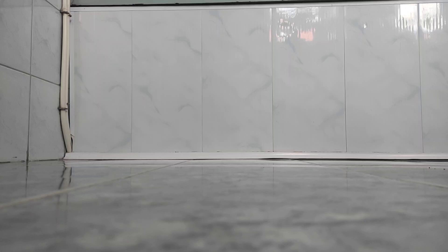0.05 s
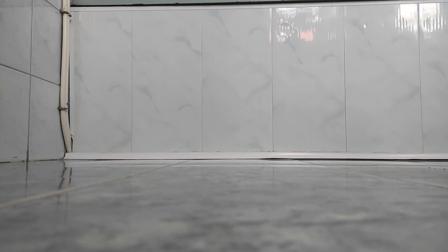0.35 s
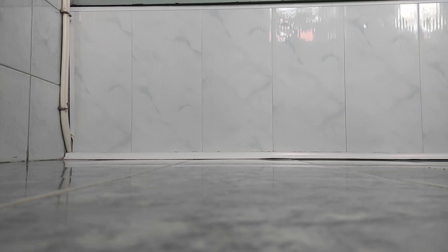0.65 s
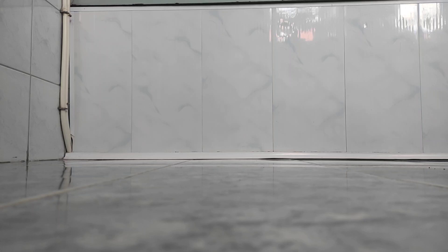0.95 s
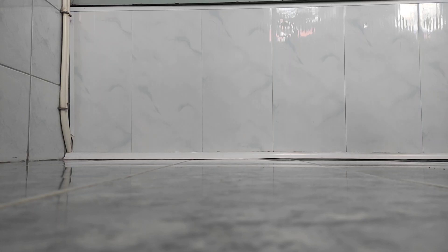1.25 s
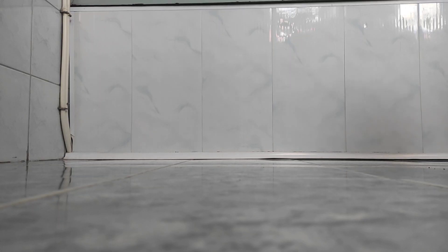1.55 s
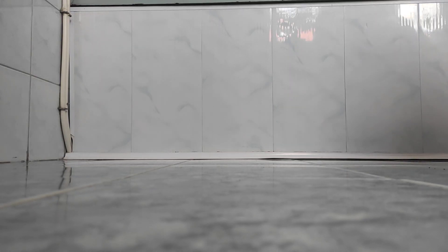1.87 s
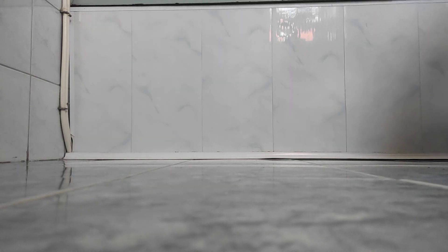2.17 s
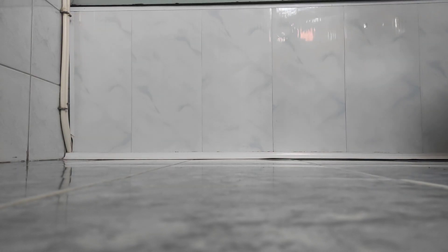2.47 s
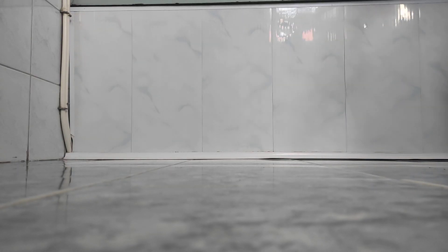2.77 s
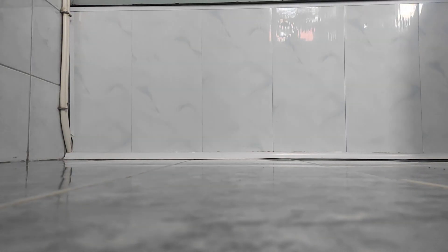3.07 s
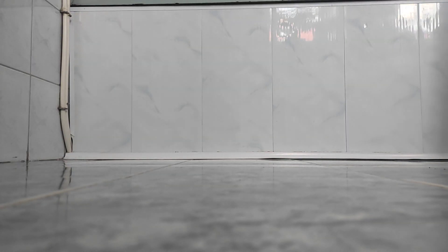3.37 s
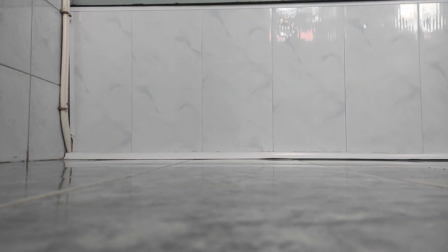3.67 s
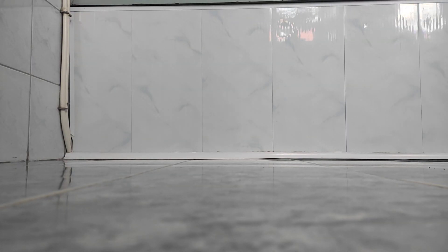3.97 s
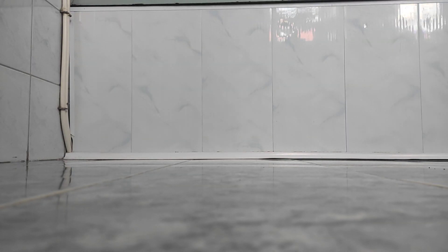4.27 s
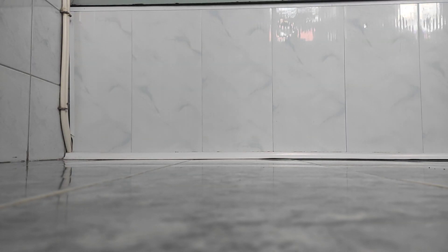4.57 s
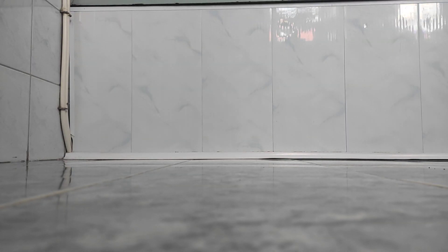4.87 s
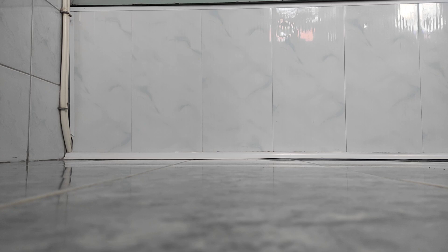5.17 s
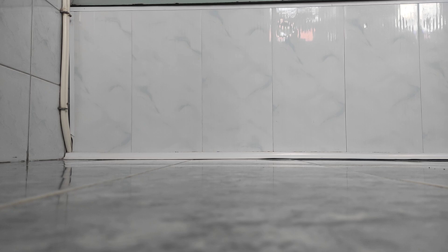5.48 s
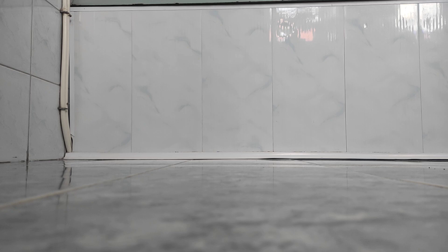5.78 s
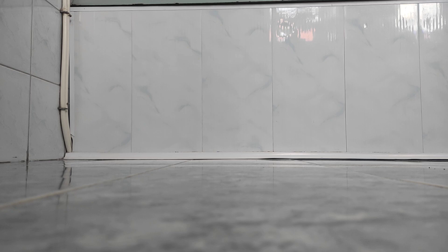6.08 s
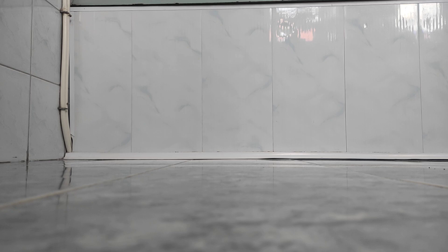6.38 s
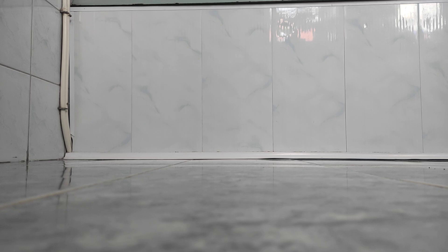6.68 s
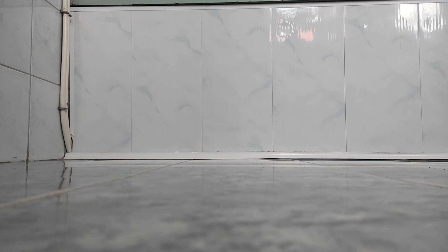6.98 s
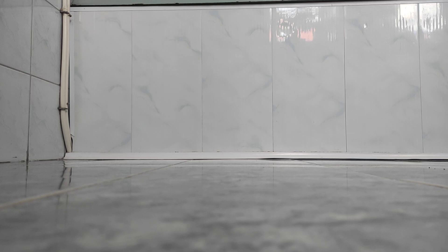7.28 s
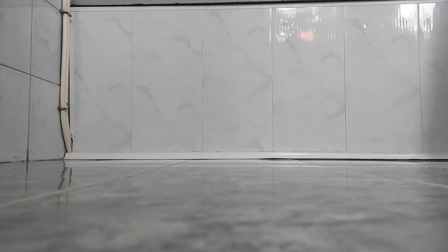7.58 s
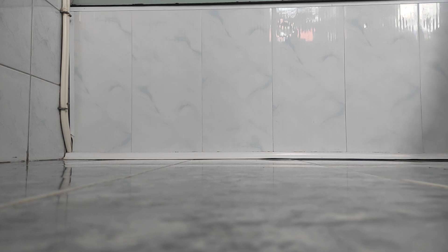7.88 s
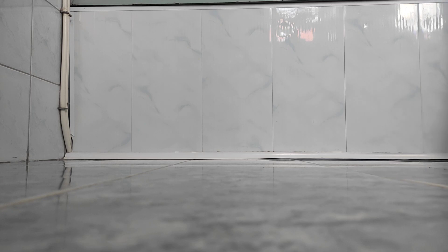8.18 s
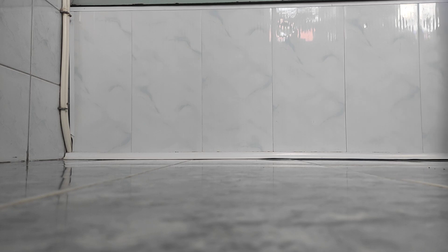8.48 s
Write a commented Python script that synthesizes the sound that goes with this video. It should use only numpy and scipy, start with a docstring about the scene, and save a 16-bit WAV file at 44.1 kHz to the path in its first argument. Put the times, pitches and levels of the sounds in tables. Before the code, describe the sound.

Wet rubber boots shuffle quietly on the floor of a small tiled room. After a light knock and two clicks, short fizzy rubs mix with squelches, heel knocks and a soft low thump. A few tiny squeaks follow, then longer hissing slides, a brief rubbery groan and a last soft step. The microphone sits low nearby, over a faint room rumble.

```python
"""Wet rubber boots shuffle and rub on a tiled floor, beside a phone standing low in a small tiled room.
The water film fizzes under the sliding soles, pressed rubber rasps, treads squelch, heels knock,
and stick-slip makes a sole chirp or groan. Heavy steps boom softly over a faint room rumble.
At the start come a knock of the phone's case, two dry clicks and a subsonic swell as the input settles.
The microphone ports ring near 7 kHz."""
import sys
import numpy as np
from scipy import signal
from scipy.fft import rfft, irfft, next_fast_len
from scipy.io import wavfile
from scipy.ndimage import uniform_filter1d

SR = 44100
rng = np.random.default_rng(int(sys.argv[2]) if len(sys.argv) > 2 else 0)


def unload_wav(signal):
    """Save mono or channel-first audio to the path in sys.argv[1] as 16-bit WAV at rate SR, clipped to [-1, 1]."""
    wavfile.write(
        sys.argv[1],
        SR,
        np.round(np.clip(np.atleast_2d(signal).T, -1, 1) * 32767).astype(np.int16),
    )


N = 385434
TIME = np.arange(N) / SR
FFT_SIZE = next_fast_len(N + SR // 2, True)
FREQ = np.maximum(np.fft.rfftfreq(FFT_SIZE, 1 / SR), 1)


def undb(db):
    """Decibels to gain."""
    return 10 ** (np.asarray(db) / 20)


def unit(x):
    """Scale to rms 1."""
    return x / np.sqrt(np.mean(x ** 2))


def filtered(x, response):
    """Apply a frequency response."""
    return irfft(rfft(x, FFT_SIZE) * response, FFT_SIZE)[..., :N]


def colour(points):
    """Gain per frequency from (frequency [Hz], level [dB]) points."""
    hz, db = np.transpose(points)
    return undb(np.interp(np.log(FREQ), np.log(hz), db))


def contour(points):
    """Gain per sample from (time [s], level [dB]) points."""
    return undb(np.interp(TIME, *np.transpose(points)))


def panned(points):
    """Stereo gains from (frequency [Hz], left minus right [dB]) points."""
    ratio = colour(points)
    return np.sqrt([ratio, 1 / ratio])


def resonance(hz, width_hz):
    """Damped resonance, gain 1 at its centre."""
    return 1 / (1 + 1j * (FREQ ** 2 - hz ** 2) / (FREQ * width_hz))


def ring(x, hz, q):
    """Two passes through one resonance, for steep skirts; rms 1."""
    b, a = signal.iirpeak(hz, max(q, .3), fs=SR)
    return unit(signal.lfilter(b, a, signal.lfilter(b, a, x)))


def wander(rate_hz):
    """Smooth random drift, spread near 1."""
    hold = int(SR / rate_hz)
    steps = np.repeat(rng.standard_normal(N // hold + 1), hold)
    return 1.08 * uniform_filter1d(steps, hold)[:N]


def swell(age_s, rise_s, fall_s, firmness):
    """Envelope, 1 at age 0; firmness 1 is pointed, 3 starts and stops abruptly."""
    return np.exp(-np.abs(age_s / np.where(age_s < 0, rise_s, fall_s)) ** firmness)


def bloom(age_s, rise_s):
    """Envelope: grows to 1 at rise_s, then dies away."""
    return age_s / rise_s * np.exp(1 - age_s / rise_s)


def add(track, start_s, sound):
    """Mix a sound into a track."""
    i = max(int(start_s * SR), 0)
    track[..., i:i + sound.shape[-1]] += sound[..., :N - i]


def crackle(rate_hz, spread_db, size):
    """Tiny slips and bursting films: random clicks of uneven size; rms 1."""
    clicks = np.zeros(size)
    hit = rng.random(size) < rate_hz / SR
    sign, strength = rng.standard_normal((hit.sum(), 2)).T
    clicks[hit] = np.sign(sign) * undb(spread_db * strength)
    return unit(clicks)


def slips(rate_hz, spread_db, size, scatter_db=8.0, wall_db=-2, wall_lag_ms=.8):
    """Stereo clicks: direct ones shared, side-wall ones late on the left, other echoes independent."""
    direct, wall, left, right = (crackle(rate_hz, spread_db, size) for _ in range(4))
    mirrored = np.array([np.roll(wall, int(wall_lag_ms * SR / 1000)), wall])
    return unit(direct + undb(wall_db) * mirrored + undb(scatter_db) * np.array([left, right]))


def rumble(db=-66.0, flutter_db=2.0, shared_hz=330, bass_hz=700):
    """Room rumble; flutters in the bass, where both sides hear nearly the same."""
    # rumble spectrum: (frequency [Hz], relative density [dB])
    spectrum = [(20, 4.5), (45, 1), (62, -1), (90, -8.5), (130, -7), (200, -4.5), (300, -10), (400, -10.5),
                (700, -16), (1500, -21.5), (3000, -24.5), (8000, -32), (10000, -34), (15000, -49.5)]
    # rumble balance: (frequency [Hz], left minus right [dB])
    balance = [(50, 6.5), (200, 6), (500, 5), (1200, 3.5), (3000, 0.5), (8000, -2)]
    shared_power = .85 / (1 + (FREQ / shared_hz) ** 2)
    air = filtered(rng.standard_normal(N), np.sqrt(shared_power))
    air = air + filtered(rng.standard_normal((2, N)), np.sqrt(1 - shared_power))
    flutter = undb(flutter_db * wander(20))
    air = air + filtered(air, FREQ < bass_hz) * (flutter - 1)
    return undb(db) * unit(filtered(air, colour(spectrum) * panned(balance)))


def film_fizz(fizz, speed, top_hz=10000, reference_db=-68, growth=0.43):
    """A faster sole fizzes louder; the top hiss brightens with louder strokes."""
    # top hiss at the reference level: (time [s], gain above top_hz [dB])
    top_brightness = [(2.8, -2), (3.3, 1.5), (4.2, 0.5), (4.5, -1.5), (5.68, -7.5), (5.76, 0.5),
                      (6.69, 0.5), (6.75, -1), (7.05, 2)]
    top_gain = contour(top_brightness) * (speed / undb(reference_db)) ** growth
    return speed * (fizz + filtered(fizz, FREQ > top_hz) * (top_gain - 1))


def sliding(fizz_db=-1.5, rasp_db=-1, creep_rasp_db=-6, hollow_db=-4, hollow_q=0.34, judder_db=0.94):
    """Dense micro-slips of wet rubber; the grip judders and shakes fizz and rasp together."""
    # water film: (frequency [Hz], relative density [dB])
    fizz_spectrum = [(1500, -27.5), (3500, -7.5), (5500, -5), (7200, -3.5), (8600, -7.5), (9200, -11),
                     (9700, -20), (12500, -24), (15500, -31)]
    # pressed rubber: (frequency [Hz], relative density [dB])
    rasp_spectrum = [(200, 4), (550, 7.5), (900, 7), (1400, 3.5), (2000, 1.5), (2800, 1.5), (4200, -4.5),
                     (6000, -10.5), (10000, -40)]
    # soles creeping between strokes: (time [s], level [dB])
    creep = [(.2, -95), (.62, -89), (.9, -78.5), (1.3, -71), (2.4, -71.5), (2.6, -67.5), (2.9, -72.5),
             (3.3, -66.5), (3.95, -69), (4.48, -78), (5.4, -72.5), (6.9, -75), (7.55, -79), (8.38, -88),
             (8.52, -77.5)]
    # sole strokes: (fastest at [s], level [dB], rise [s], fall [s], rasp offset [dB],
    # hollow under the sole [Hz], firmness [-])
    strokes = [(.35, -78.5, .055, .091, -2, 600, 1.2), (.474, -76, .033, .018, -4, 450, 1.2),
               (.8, -71, 0.055, 0.099, -5, 2000, 0.76), (1.037, -64.5, .016, 0.077, -8, 905, 1.1),
               (1.204, -67.5, 0.035, 0.06, -7, 2460, 1), (1.307, -70.5, .017, .044, 2, 1810, 1.5),
               (1.435, -67, 0.077, 0.073, 2, 1000, 1.5), (1.653, -66, .018, 0.072, -7, 2770, 1.3),
               (1.816, -63.5, 0.051, 0.12, -6, 1780, 1.2), (1.992, -62, 0.04, 0.047, -7, 1850, 1.7),
               (2.335, -65, 0.054, 0.054, 3, 1110, 0.95), (2.52, -61, 0.038, 0.054, -4, 2300, 1.7),
               (2.666, -65.5, .008, .12, -3.5, 2180, 1.2), (3.11, -74.5, 0.097, 0.038, 3, 1780, 1.4),
               (3.25, -63, 0.027, 0.029, -14, 2800, 1.2), (3.442, -61.5, 0.035, .028, -5, 2380, 1.8),
               (3.635, -60, 0.062, 0.073, -4, 800, 1.7), (3.86, -69.5, .06, 0.035, -10, 400, 1.2),
               (4.16, -62.5, .11, 0.13, -9.5, 400, 1.3), (4.4, -69.5, 0.023, 0.021, -14, 2600, 1.2),
               (4.85, -61, 0.22, 0.16, -33, 4540, 1.26), (5, -56.5, .19, 0.26, -12, 1980, 1.05),
               (5.77, -62, 0.076, 0.14, -24, 3000, 2), (5.9, -63, .11, 0.2, -17, 2590, 1.2),
               (6.17, -59, 0.22, 0.47, -8.5, 2080, 1.3), (6.32, -59, 0.11, 0.13, -8.5, 1250, 2.4),
               (6.635, -58.5, 0.14, 0.079, -7.5, 1600, 1.5), (6.8, -67.5, 0.028, 0.079, -10, 2260, 1.3),
               (7.04, -67, .016, .04, -11, 2990, 1.8), (7.115, -63.5, 0.087, .17, -8.5, 910, 1.15),
               (7.83, -76, 0.1, 0.36, -8.5, 2300, 0.99)]
    fizz = unit(filtered(slips(rate_hz=14000, spread_db=3, size=N), colour(fizz_spectrum)))
    rasp = unit(filtered(slips(rate_hz=6000, spread_db=3, size=N), colour(rasp_spectrum)))
    fizz_power = contour(creep) ** 2
    rasp_power = fizz_power * undb(creep_rasp_db) ** 2
    hollow = np.zeros((2, N))
    for at_s, db, rise_s, fall_s, press_db, hz, firmness in strokes:
        near = slice(*np.searchsorted(TIME, [at_s - 4 * rise_s, at_s + 4 * fall_s]))
        speed = undb(db) * swell(TIME[near] - at_s, rise_s, fall_s, firmness)
        force = speed * undb(press_db)
        fizz_power[near] += speed ** 2
        rasp_power[near] += force ** 2
        hollow[:, near] += force * ring(rasp[:, near], hz, hollow_q)
    water = undb(fizz_db) * film_fizz(fizz, np.sqrt(fizz_power))
    rubber = undb(rasp_db) * rasp * np.sqrt(rasp_power) + undb(hollow_db) * hollow
    return (water + rubber) * undb(judder_db * wander(70))


def case_knock(start_s=.2277, db=-48, tick_hz=1500, thud_hz=170, sag_s=0.0012, decay_s=0.011):
    """The phone's case settles on the floor by the left port: a tick that drops at once to a thud."""
    out, t = np.zeros(N), TIME[:SR // 8]
    hz = thud_hz + (tick_hz - thud_hz) * np.exp(-t / sag_s)
    phase = 2 * np.pi * np.cumsum(hz) / SR
    add(out, start_s, undb(db) * np.exp(-t / decay_s) * np.sin(phase))
    return out * undb([[0], [-24]])


def input_settling(start_s=0.24, rise_s=0.087, db=-33, pan_db=6.5, undershoot_db=-21, undershoot_s=0.6,
                   drift_db=-25, drift_decay_s=3.1):
    """A slow subsonic swell, undershoot and fading drift as the input settles."""
    age_s = np.maximum(TIME - start_s, 0)
    wave = bloom(age_s, rise_s) - undb(undershoot_db) * bloom(age_s, undershoot_s)
    drift = undb(drift_db) * uniform_filter1d(wander(12), SR // 12)
    settling = np.minimum(age_s / rise_s, 1) * np.exp(-age_s / drift_decay_s)
    return (wave + drift * settling) * undb([[db + pan_db], [db - pan_db]])


def dry_clicks(decay_s=.012, rise_s=.00003, right_db=-11):
    """Two dry clicks near the start, each a sudden step that quickly decays."""
    # clicks: (time [s], level [dB])
    clicks = [(0.2893, -44.5), (0.329, -53)]
    out, t = np.zeros(N), TIME[:SR // 8]
    step = -(1 - np.exp(-t / rise_s)) ** 3 * np.exp(-t / decay_s)
    for start_s, db in clicks:
        add(out, start_s, undb(db) * step)
    return out * undb([[0], [right_db]])


def pops(hz=7400, rise_s=.0003, pitch_spread=.05):
    """Tiny bubbles burst at a sole's edge, each a bright tick at its own pitch."""
    # bursts: (time [s], level [dB])
    bubbles = [(1.0161, -57), (1.0189, -47), (1.0213, -51), (1.8055, -53), (1.811, -52), (2.6615, -52)]
    out, t = np.zeros(N), TIME[:SR // 100]
    for start_s, db in bubbles:
        pitch_hz = hz * (1 + pitch_spread * rng.standard_normal())
        add(out, start_s, undb(db) * bloom(t, rise_s) * np.sin(2 * np.pi * pitch_hz * t))
    return out


def knocks(heel_q=.75, splash_hz=7400, splash_q=5.2):
    """Heel or toe lands: a short dull knock, with a spit of water from the closing gap."""
    # impacts: (time [s], level [dB], decay by 27 dB [s], relative splash [dB])
    impacts = [(1.0185, -61, 0.022, -9), (1.555, -53.5, 0.019, -20), (1.653, -62, 0.012, -5),
               (1.805, -58.5, 0.018, -5), (2.661, -61, .018, -4), (8.446, -69, 0.02, -8)]
    # heel resonances: (frequency [Hz], gain [dB])
    heel_modes = [(900, 4.5), (2600, -8.5)]
    out, t = np.zeros(N), TIME[:SR // 8]
    for start_s, db, decay_s, splash_db in impacts:
        body, spit = rng.standard_normal((2, len(t)))
        heel = sum(undb(mode_db) * ring(body, hz, heel_q) for hz, mode_db in heel_modes)
        splash = undb(splash_db) * ring(spit, splash_hz, splash_q)
        add(out, start_s, undb(db) * np.exp(-np.pi * t / decay_s) * (heel + splash))
    return out


def squirt(start_s=1.02, db=-65.0, rise_s=0.029, hz=7600, q=2.5):
    """The first weight on the sole drives a thin, hissing jet of water from under its edge."""
    out, t = np.zeros((2, N)), TIME[:SR // 4]
    jet = ring(slips(rate_hz=9000, spread_db=3.3, size=len(t)), hz, q)
    add(out, start_s, undb(db) * bloom(t, rise_s) * jet)
    return out


def treads(q=0.91, slip_hz=1500, grain_db=3, rise_share=0.052):
    """A tread presses out water: a burst of slips rings the pocket under the sole."""
    # presses: (time [s], level [dB], decay by 40 dB [s], pocket [Hz])
    presses = [(1.146, -66.5, .12, 420), (1.285, -59, 0.2, 310), (1.78, -60, .039, 350),
               (1.805, -62, .19, 304), (1.97, -61.5, .15, 290), (2.18, -68, .15, 218),
               (2.285, -62, 0.12, 438), (2.319, -63, .13, 400), (3.421, -67, .11, 450),
               (3.521, -67.5, 0.15, 197), (3.612, -62, 0.15, 400), (8.443, -65, .12, 430),
               (8.5, -63.5, 0.098, 280)]
    out, t = np.zeros((2, N)), TIME[:SR]
    for start_s, db, decay_s, hz in presses:
        rise_s = rise_share * decay_s
        squeeze = np.minimum(t / rise_s, 1) * undb(-40 * np.maximum(t - rise_s, 0) / decay_s)
        pocket = ring(slips(slip_hz, grain_db, len(t)), hz, q)
        add(out, start_s, undb(db) * squeeze * pocket)
    return out


def bumps():
    """A rubber sole's edge lands: a hollow note that dies within a few cycles."""
    # landings: (time [s], level [dB], rise [s], pitch [Hz])
    landings = [(1.289, -54.5, 0.0061, 339), (2.278, -54, 0.0045, 407), (2.321, -59, 0.0035, 390),
                (2.893, -55.5, 0.0026, 425), (3.614, -58, .008, 395), (8.447, -67, 0.0015, 430),
                (8.517, -66, .0038, 200)]
    out, t = np.zeros(N), TIME[:SR // 10]
    for start_s, db, rise_s, hz in landings:
        add(out, start_s, undb(db) * bloom(t, rise_s) ** 2 * np.sin(2 * np.pi * hz * t))
    return out


def boom(hz=59, q=2.7, pan_db=2.0):
    """Heavy steps set a low room mode swelling and fading; lighter shifts stir it at random."""
    # light shifts of weight: (time [s], level [dB])
    shifts = [(1.6, -77), (2.02, -72), (2.12, -82), (2.22, -71), (3.1, -72), (3.55, -74), (3.9, -90)]
    # heavy steps: (time [s], level [dB], rise [s])
    steps = [(1.617, -44.5, 0.063), (1.848, -56.5, 0.03), (2.375, -61.5, 0.04), (4.98, -62.5, 0.11),
             (8.46, -62.5, 0.073)]
    out = ring(rng.standard_normal(N), hz, q) * contour(shifts)
    t = TIME[:SR]
    for start_s, db, rise_s in steps:
        add(out, start_s, undb(db) * bloom(t, rise_s) ** 2 * np.sin(2 * np.pi * hz * t))
    return out * undb([[pan_db], [-pan_db]])


def squelches(q=2.3, slip_hz=1800, grain_db=3, shrink_per_s=1.5):
    """Water forced through a tread groove rings it; the note climbs as the groove shrinks."""
    # squeezes: (loudest at [s], level [dB], half length [s], groove pitch when loudest [Hz])
    squeezes = [(1.992, -79, .03, 2060), (2.335, -65.5, 0.02, 1970), (2.523, -60, 0.039, 2520),
                (3.603, -65, .011, 2400)]
    out, t = np.zeros((2, N)), TIME[:SR // 3]
    age_s = t - t.mean()
    read_index = np.cumsum(np.exp(shrink_per_s * age_s))
    for at_s, db, half_s, hz in squeezes:
        groove = ring(slips(slip_hz, grain_db, SR), hz, q)
        gliding = np.array([np.interp(read_index, np.arange(SR), side) for side in groove])
        add(out, at_s - t.mean(), undb(db) * np.exp(-(age_s / half_s) ** 2) * gliding)
    return out


def shuffles(q=0.74, slip_hz=2500, grain_db=3.0, firmness=3):
    """A loose boot drags softly: a low, diffuse rustle with no impact."""
    # drags: (loudest at [s], level [dB], half length [s], centre [Hz])
    drags = [(2.35, -63.5, 0.031, 230), (2.765, -68, 0.063, 420), (3.126, -69, .022, 620),
             (5.385, -70.5, 0.069, 380), (6.295, -67.5, 0.053, 260), (6.655, -68.5, .025, 230),
             (6.93, -71.5, 0.063, 300)]
    out, t = np.zeros((2, N)), TIME[:SR // 2]
    for at_s, db, half_s, hz in drags:
        speed = swell(t - t.mean(), half_s, half_s, firmness)
        rustle = ring(slips(slip_hz, grain_db, len(t)), hz, q)
        add(out, at_s - t.mean(), undb(db) * speed * rustle)
    return out


def chirps(q=5.7, lower_ratio=0.594, slip_gap_s=.0018, jitter=.2):
    """A tread edge sticks and slips a few times, fast; each slip rings the rubber at two pitches."""
    # slip bursts: (loudest at [s], level [dB], half length [s], pitch [Hz], lower partial [dB])
    bursts = [(3.446, -58.5, .002, 2850, -12), (3.455, -52.8, .0036, 2600, -11),
              (3.587, -53.5, .0036, 2270, -13), (7.8122, -66, .002, 2500, 0),
              (7.8218, -64, .0012, 2400, -2), (7.8258, -59.8, .003, 2350, -8),
              (8.0268, -58.5, .0046, 2330, 0)]
    out, t = np.zeros(N), TIME[:SR // 10]
    middle_s = t.mean()
    for at_s, db, half_s, hz, lower_db in bursts:
        grip = 1 / np.cosh(2 * (t - middle_s) / half_s)
        slip_count = np.cumsum(1 + jitter * wander(500)[:len(t)]) / (slip_gap_s * SR)
        jerks = grip * np.diff(np.floor(slip_count), prepend=0)
        note = ring(jerks, hz, q) + undb(lower_db) * ring(jerks, hz * lower_ratio, q)
        grip_rms = np.sqrt(np.mean(grip ** 2))
        add(out, at_s - middle_s, undb(db) * grip_rms * unit(note))
    return out


def groan(partials_db=(-3, 0, -12, -20), jitter=.04, shimmer_db=2.5):
    """A dragged sole groans: slow, uneven stick-slip whose rate follows its speed."""
    # drag: (time [s], slip rate [Hz], level [dB])
    drag = [(6.88, 150, -75), (7.06, 153.6, -72.5), (7.09, 158, -66), (7.115, 171, -60), (7.15, 161, -64.5),
            (7.19, 146, -74), (7.23, 140, -94)]
    times_s, hz, db = np.transpose(drag)
    slip_hz = np.interp(TIME, times_s, hz) * (1 + jitter * wander(160))
    phase = 2 * np.pi * np.cumsum(slip_hz) / SR
    tone = sum(undb(partial_db + shimmer_db * wander(110)) * np.sin(k * phase)
               for k, partial_db in enumerate(partials_db, 1))
    envelope = np.interp(TIME, times_s, undb(db), left=0, right=0)
    return unit(tone) * envelope * undb([[3], [-9]])


def tiled_room(x, right_lag_ms=0.3297, wet_db=-11, t60_s=0.33):
    """Sound reaches the left port first; the tiles ring briefly and standing waves colour the lows."""
    # standing waves between the walls: (frequency [Hz], width [Hz], gain [dB])
    modes = [(202, 37, -3.5), (398, 74, -9.5)]
    # boot balance, lows left and highs right: (frequency [Hz], left minus right [dB])
    balance = [(200, 14.5), (500, 4.5), (900, -2.5), (1500, -6.5), (2100, -10), (4000, -7.5), (7000, -5.5),
               (9000, -3), (14000, 0)]
    t = TIME[:SR // 2]
    direct = np.exp(-2j * np.pi * FREQ * np.array([[0], [right_lag_ms / 1000]]))
    echoes = rng.standard_normal((2, len(t))) * undb(-60 * t / t60_s)
    tail = rfft(unit(echoes) / np.sqrt(len(t)), FFT_SIZE)
    standing = 1 + sum(undb(db) * resonance(hz, width_hz) for hz, width_hz, db in modes)
    return filtered(x, (direct + undb(wet_db) * tail) * standing * panned(balance))


def scene():
    """Boots in the room, over its rumble."""
    boots = sliding() + squelches() + squirt() + pops() + treads()
    boots += shuffles() + bumps() + knocks() + chirps()
    opening = case_knock() + dry_clicks() + input_settling()
    return tiled_room(boots) + groan() + opening + boom() + rumble()


def record(dry, fade_in_s=0.26, top_hz=15720):
    """The microphone ports ring in the treble, the input fades in, and the top is cut."""
    # port resonances, left then right: (frequency [Hz], width [Hz], gain [dB])
    ports = [(7700, 1250, 3.5), (7250, 1085, 7)]
    response = np.array([1 + undb(db) * resonance(hz, width_hz) for hz, width_hz, db in ports])
    fade = np.minimum(TIME / fade_in_s, 1) ** 2
    lowpass = signal.ellip(10, .2, 70, top_hz, fs=SR, output="sos")
    return signal.sosfilt(lowpass, filtered(dry, response) * fade)


dry = scene()
out = record(dry)
unload_wav(out)
```